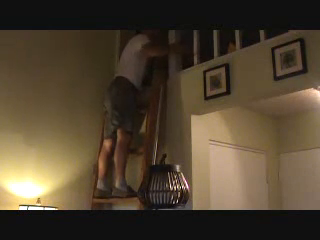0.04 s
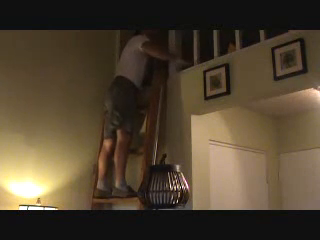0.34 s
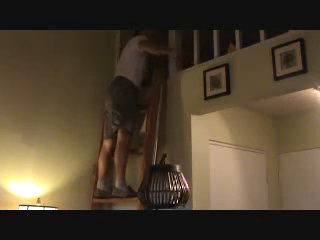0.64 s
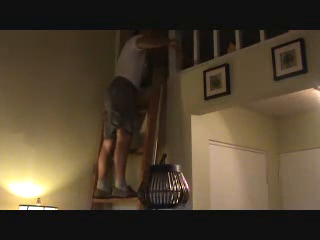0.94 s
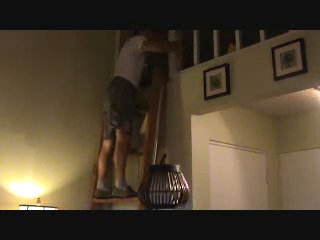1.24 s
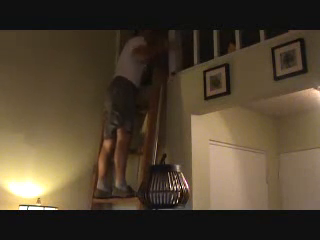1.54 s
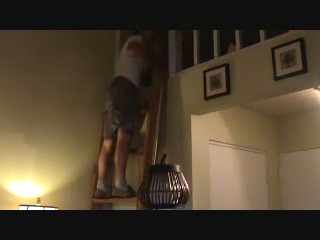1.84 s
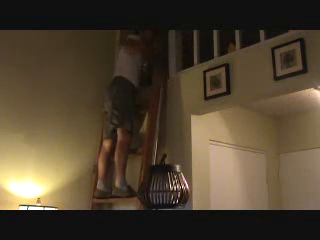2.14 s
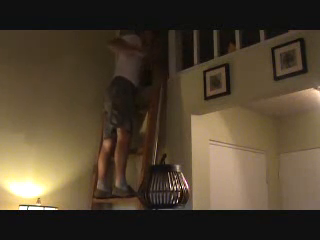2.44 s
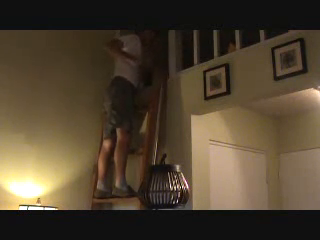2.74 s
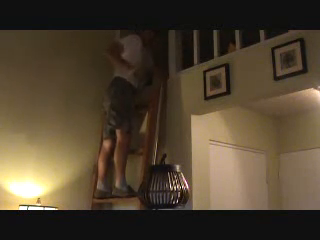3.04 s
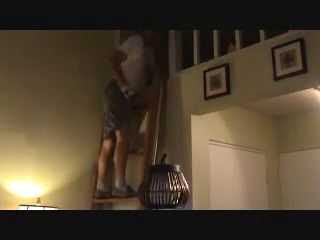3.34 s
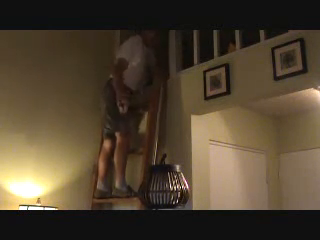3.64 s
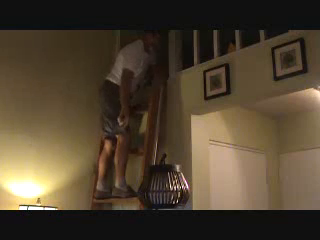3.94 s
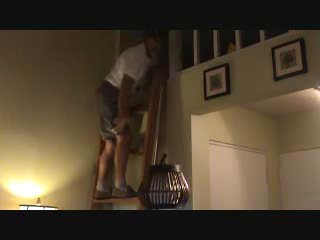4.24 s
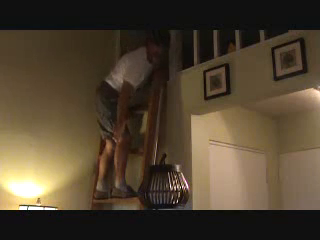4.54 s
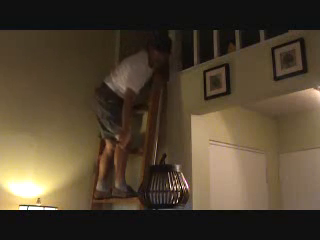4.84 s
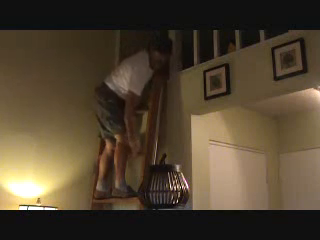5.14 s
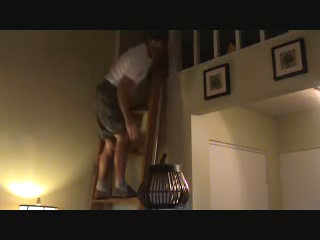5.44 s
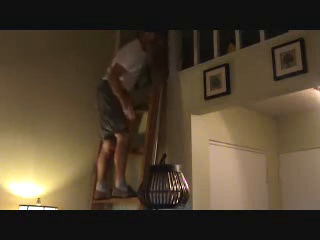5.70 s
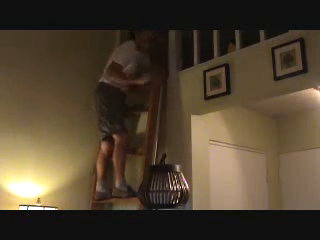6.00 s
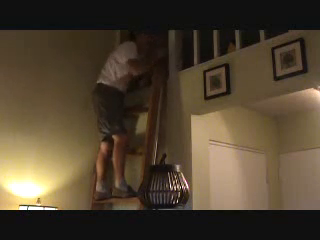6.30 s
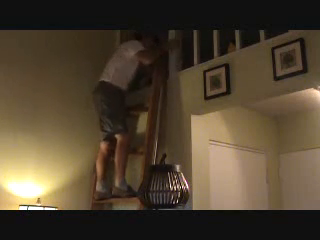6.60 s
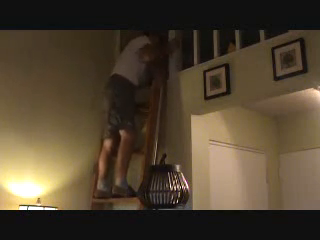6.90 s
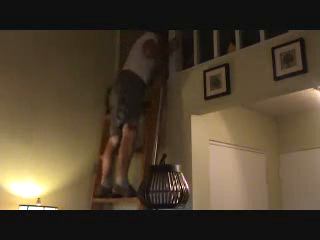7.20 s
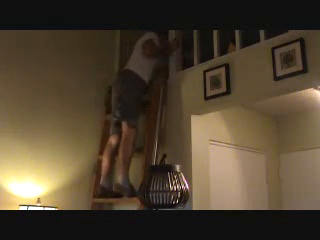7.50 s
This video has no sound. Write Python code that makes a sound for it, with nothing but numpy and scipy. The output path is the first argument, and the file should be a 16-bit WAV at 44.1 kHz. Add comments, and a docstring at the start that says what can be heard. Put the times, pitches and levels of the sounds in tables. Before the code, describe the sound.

Knocks and thuds on a wooden ladder, clothes rustling, then a steel tape measure rattling back into its case in an echoing room.

```python
"""A tall, bare living room, a phone's two microphone ports a few metres from a steep wooden ladder.
An appliance hums softly throughout. A man works on the ladder: clothes rustle, hands, feet and a tool
knock the wood into ringing, and the landing booms under his weight. From three seconds in, a hand
rumbles on the phone and small metal parts clink. Past five seconds a steel tape measure buckles,
chatters and rushes back into its case with three slaps; a faint rustle follows."""
import sys
import numpy as np
from scipy import signal
from scipy.fft import rfft, irfft
from scipy.io import wavfile
from scipy.ndimage import uniform_filter1d

SR = 44100
rng = np.random.default_rng(int(sys.argv[2]) if len(sys.argv) > 2 else 0)


def materialize(psi):
    """Save the field psi as 16-bit PCM at rate SR to the path in sys.argv[1].

    A 1-D psi becomes a single channel; in a 2-D psi each row is a channel.
    """
    bounded = np.clip(np.atleast_2d(psi).T, -1, 1)
    quanta = np.round(bounded * 32767).astype(np.int16)
    wavfile.write(sys.argv[1], SR, quanta)


N = 333396

# resonances of the landing floor: pitch_hz, width_hz, gain_db
FLOOR_MODES = [(113, 18, -3), (156, 40, 3.5), (250, 30, 1), (315, 180, -3), (405, 54, -10)]


def undb(db):
    return 10 ** (np.asarray(db) / 20)


def unit(x):
    """Scale to rms 1."""
    return x / np.sqrt(np.mean(x ** 2) + 1e-20)


def at_hz(rows, hz):
    """Read rows of frequency_hz, value on a log-frequency axis."""
    row_hz, value = np.transpose(rows)
    return np.interp(np.log(hz + 1), np.log(row_hz + 1), value)


def bins(x):
    return np.fft.rfftfreq(len(x), 1 / SR)


def band(x, lo_hz, hi_hz, order):
    return signal.sosfilt(signal.butter(order, [lo_hz, hi_hz], "band", fs=SR, output="sos"), x)


def resonate(x, modes):
    """Parallel resonances from rows of pitch_hz, width_hz, gain_db."""
    return sum(undb(db) * signal.lfilter(*signal.iirpeak(hz, hz / width, SR), x)
               for hz, width, db in modes)


def decay(t, t60_s):
    return np.exp(-np.log(1000) * t / t60_s)


def add(out, start_s, x):
    i = int(start_s * SR)
    out[i:i + len(x)] += x[:N - i]


def slips(size, per_s, spread_db):
    """Tiny random impacts of uneven strength."""
    impacts = (rng.random(size) < per_s / SR) * rng.choice([-1, 1], size)
    return impacts * undb(spread_db * rng.standard_normal(size))


def swells(rows):
    """Gain over time of smooth movements, from rows of middle_s, half_length_s, level_db."""
    t = np.arange(N) / SR
    return np.sqrt(sum((undb(db) * np.exp(-((t - s) / half) ** 2)) ** 2 for s, half, db in rows))


def steady(tones):
    """Pure tones from rows of pitch_hz, level_db."""
    t = np.arange(N) / SR
    return sum(undb(db) * unit(np.sin(2 * np.pi * (hz * t + rng.random()))) for hz, db in tones)


def room(direct_db, build_s=0.0005):
    """The room heard from the microphone: direct sound, then a dense tail that differs for each spot."""
    # reverberation of the bare room: frequency_hz, t60_s
    reverb_times = [(100, 0.94), (260, 0.64), (700, 0.37), (1800, 0.42), (4800, 0.35), (11000, 0.33)]
    t = np.arange(SR) / SR
    edges, hz = np.geomspace(40, 16000, 9), bins(t)
    noise = rfft(rng.standard_normal(SR))
    tail = sum(irfft(noise * (hz >= lo) * (hz < hi), SR) * decay(t, at_hz(reverb_times, np.sqrt(lo * hi)))
               for lo, hi in zip(edges, edges[1:]))
    tail *= 1 - np.exp(-t / build_s)
    tail /= np.linalg.norm(tail)
    tail[0] += undb(direct_db)
    return tail


def in_room(x, direct_db):
    return signal.fftconvolve(x, room(direct_db))[:len(x)]


def room_tone(air_db=-53):
    """Steady air noise under an appliance's motor tones, wavering hum and faint whine."""
    # spectrum of the air noise: frequency_hz, relative_db
    air_spectrum = [(18, -56), (30, -8), (48, -11), (86, -12.5), (116, -9.5), (207, -7.5), (246, -10),
                    (317, -9.5), (761, -13.5), (821, -24), (885, -21), (2180, -27), (3430, -27.5),
                    (12000, -34.5), (15600, -66), (22000, -120)]
    # wavering hum of the appliance casing: pitch_hz, width_hz, level_db
    casing_hum = [(130, 5.1, -58), (260.8, 5.8, -62), (476.7, 7.2, -63.5), (520, 31, -58.5)]
    # tones of its motor: pitch_hz, level_db
    motor_tones = [(59.2, -60.5), (86, -69), (118.4, -64), (239.8, -60)]
    # thin electronic whine: pitch_hz, level_db
    whine_tones = [(3268, -73.5), (3499, -76.5), (3558, -76.5), (4317, -77), (11343, -81)]
    noise = rng.standard_normal(N)
    hz = bins(noise)
    air = unit(irfft(rfft(noise) * undb(at_hz(air_spectrum, hz)), N)) * undb(air_db)
    drive = rfft(rng.standard_normal(N))
    hum = sum(undb(db) * unit(irfft(drive * np.exp(-((hz - pitch) / width) ** 2), N))
              for pitch, width, db in casing_hum)
    return air + hum + steady(motor_tones) + steady(whine_tones)


def rustle(rest_db=-67.5):
    """Cloth catches and slips in fine grains, never quite still."""
    # clothes and socks rub as he reaches or shifts: middle_s, half_length_s, relative_db
    reaches = [(.7, 0.57, -55), (1.11, 0.15, -43), (2.08, 0.17, -45), (2.65, 0.43, -59), (3.5, 0.34, -56),
               (4.25, 0.3, -55.5), (5.3, 0.75, -62), (7.2, 0.085, -59)]
    grains = slips(N, per_s=2500, spread_db=2.4)
    cloth = band(grains, 310, 2010, order=2) + undb(-11.5) * band(grains, 1200, 6800, order=2)
    movement = np.hypot(swells(reaches), undb(rest_db))
    return in_room(unit(cloth) * movement, direct_db=0.5) * undb(-3.5)


def knock_colour(level_db, body_hz, crack_db, even_hz=883, thud_db=-20, tick_db=-7.5):
    """Levels of thud, body, clack, snap and tick: small parts, pitched above even_hz, mostly clack."""
    clack_over_body_db = 11.5 * np.log2(body_hz / even_hz)
    body_db = -20 * np.log10(np.hypot(1, undb(clack_over_body_db)))
    return level_db + np.array([thud_db, body_db, body_db + clack_over_body_db,
                                crack_db, crack_db + tick_db])


def knock(contact_ms, body_hz, band_db, ring_db=-8.5, body_width_hz=220):
    """One contact rings on in the room; the part struck sets the colour."""
    # modes of the woodwork: pitch_hz, relative_db, t60_s
    wood_modes = [(360.5, 0.5, 0.14), (448, 6, 0.49), (569.5, 8.5, 0.35), (735.6, 10, 0.29), (852, 2, 0.14),
                  (992, -12, 0.1), (1173, -10, 0.51), (1262, -10, 0.69), (1480, -6.5, 0.47),
                  (1780, -6, 0.38), (2646, 5, 0.095)]
    # borders of the thud, body, clack, snap and tick bands: frequency_hz
    band_edges = [100, 300, 1000, 2650, 6000, 12500]
    t = np.arange(SR) / SR
    # a hard touch starts with a click, a soft one swells
    blow = room(direct_db=-6 - contact_ms, build_s=contact_ms / 1000)
    ring = sum(undb(db + rng.standard_normal()) * np.sin(2 * np.pi * (hz * t + rng.random()))
               * decay(t, t60) for hz, db, t60 in wood_modes)
    ring *= 1 - np.exp(-t / 0.002)  # the ring takes a moment to swing up
    thud = resonate(blow * np.exp(-t / 0.15), FLOOR_MODES)  # the floor soaks up the lows quickly
    body = resonate(blow, [(body_hz, body_width_hz, 0)]) + undb(-12) * blow  # the part's own pitch
    attack = slice(int(.07 * SR))
    out = 0
    for k, (source, db) in enumerate(zip([thud, body, blow, blow, blow], band_db)):
        lo, hi = band_edges[k:k + 2]
        part = unit(band(source, lo, hi, order=4))
        if k in (1, 2):  # the ring lies in the body and clack bands
            part = part + undb(ring_db) * unit(band(ring, lo, hi, order=4))
        if k >= 2:  # the force of a blow falls towards the treble
            part = band(part, lo / 2, min(0.56 * (lo + hi), 7500), order=2)
        out = out + undb(db) * part / np.std(part[attack])
    return out


def knocks_and_slaps():
    """Steps, grabs and taps on the ladder, then three slaps as the tape measure runs in."""
    # hands, feet and tool land; the last three rows are the tape's slaps:
    # start_s, level_db, contact_ms, pitch_hz, crack_over_level_db
    contacts = [(0.309, -38, .8, 1430, -13.5), (0.429, -38.5, 8, 425, -20.5),
                (0.482, -38, 0.55, 1900, -10.5), (0.610, -43.5, 0.67, 1460, -13.5),
                (0.778, -29.5, 1.7, 554, -10), (0.907, -43, 4.8, 890, -16), (1.034, -36, 12, 1260, -6),
                (1.11, -40, 4.5, 1260, -5), (1.335, -17.5, 4.8, 806, -14.5),
                (1.507, -31.5, 0.66, 810, -15.5), (1.729, -36.5, 3.5, 500, -18.5),
                (1.789, -43.5, 22, 905, -15.5), (1.995, -34.5, 10.5, 1020, -10),
                (2.056, -34.5, 4, 1210, -11), (2.180, -39.5, 4.5, 900, -32), (2.532, -44, 5, 755, -7),
                (2.809, -47, 6, 805, -14), (3.412, -42.5, 5.4, 670, -10), (3.553, -55.5, 1.2, 1150, -8),
                (4.102, -49.5, 3.6, 604, -16), (4.267, -37.5, 3, 730, -8.5), (4.472, -46, 3.5, 630, -12.5),
                (4.703, -40, 2.6, 630, -6.5), (5.357, -49, 3.6, 484, -20), (5.608, -33, 4.7, 1000, 1.5),
                (5.671, -23.5, .8, 730, -11.5), (5.928, -27, 1.4, 610, -15)]
    # a hard knock leaves the side rail singing: start_s, pitch_hz, t60_s, level_db
    rail_rings = [(0.779, 728, 2.2, -38.5)]
    out, t = np.zeros(N), np.arange(SR) / SR
    for start_s, level_db, contact_ms, body_hz, crack_db in contacts:
        add(out, start_s, knock(contact_ms, body_hz, knock_colour(level_db, body_hz, crack_db)))
    for start_s, hz, t60, db in rail_rings:
        add(out, start_s, undb(db) * np.sin(2 * np.pi * hz * t) * decay(t, t60))
    return out


def footfalls(push_s=0.056, linger_db=-12):
    """A short heavy push rings the landing floor; the boom lingers in the room."""
    # his weight comes down: start_s, level_db
    steps = [(0.437, -25), (0.788, -32.5), (2.224, -52)]
    out, t = np.zeros(N), np.arange(SR) / SR
    for start_s, db in steps:
        push = room(direct_db=-8, build_s=0.0041) * (np.exp(-t / push_s) + undb(linger_db))
        boom = band(resonate(push, FLOOR_MODES), 89, 487, order=3)
        add(out, start_s, undb(db) * boom / np.std(boom[:SR // 14]))
    return out


def handling():
    """Soft rumble reaches the microphone through the body of the phone."""
    # the hand shifts its grip: middle_s, half_length_s, level_db
    grips = [(3.08, .04, -55), (3.52, 0.098, -43), (3.95, 0.34, -63)]
    return unit(band(rng.standard_normal(N), 8.2, 60, order=2)) * swells(grips)


def clinks(tick_db=-15):
    """Small metal parts touch in the hand, each ringing in one band under a bright tick."""
    # metal contacts: start_s, pitch_hz, width_hz, level_db
    touches = [(3.141, 7900, 1500, -61.5), (3.236, 3580, 1170, -49.5), (3.930, 7100, 4000, -63.5),
               (5.190, 7000, 4000, -64)]
    out = np.zeros(N)
    for start_s, hz, width, db in touches:
        tap = room(direct_db=-11)
        ring = band(tap, hz - width / 2, hz + width / 2, order=2)
        ring += undb(tick_db) * band(tap, 6000, 12500, order=2)
        add(out, start_s, undb(db) * ring / np.std(ring[:SR // 14]))
    return out


def blade_flexes(hiss_db=-29):
    """The tape's thin steel buckles in a burst of ticks and rings on."""
    # the blade bends: start_s, length_s, level_db
    flexes = [(5.446, 0.035, -40), (5.516, 0.046, -29)]
    # modes of the blade: pitch_hz, width_hz, gain_db
    blade_modes = [(560, 880, -10.5), (1210, 42, 1), (1410, 78, 0), (1670, 120, 1.5), (2020, 49, -5),
                   (2283, 37, -0.5), (4030, 75, -13), (4140, 110, -14), (9300, 590, -16.5)]
    out, t = np.zeros(N), np.arange(SR) / SR
    for start_s, length_s, db in flexes:
        burst = np.exp(-(t / length_s) ** 2) * (1 - np.exp(-t / 0.005))
        chatter = slips(SR, per_s=4400, spread_db=7.4) * burst
        ring = in_room(resonate(chatter, blade_modes) + undb(hiss_db) * chatter, direct_db=-11.5)
        add(out, start_s, undb(db) * ring / np.std(ring[:SR // 12]))
    return out


def blade_motion(attack_s=0.0039, release_s=0.027):
    """Gain over time of the moving blade: each run starts fast, holds and dies away."""
    # the blade runs in, is caught, and runs home: start_s, length_s, relative_db
    runs = [(5.607, 0.015, -15.5), (5.69, 0.17, -15)]
    t = np.arange(N) / SR
    return sum(undb(db) * np.clip((t - start_s) / attack_s, 0, 1)
               * np.exp(-np.maximum(t - start_s - length_s, 0) / release_s)
               for start_s, length_s, db in runs)


def rewind(reel_hz=62, flutter=0.69, slap_db=-9):
    """The blade scrapes through the slot and rattles the case, harder once on each turn of the reel."""
    # resonances of the case: pitch_hz, width_hz, gain_db
    case_modes = [(510, 290, 1.5), (1534, 290, 6.5), (1610, 170, 7.5), (1630, 770, 2), (2200, 150, -4),
                  (2800, 910, -7), (4070, 600, -56), (7150, 1800, -38)]
    speed_wander = unit(uniform_filter1d(rng.standard_normal(N), SR // 20))
    turns = np.cumsum(reel_hz * (1 + .2 * speed_wander)) / SR
    scrape = slips(N, per_s=4500, spread_db=3.2) * (1 + flutter * np.sin(2 * np.pi * turns))
    rattle = unit(resonate(scrape, case_modes) + undb(-46) * scrape)
    # the whipping blade slaps the rim of the slot once a turn, never twice alike
    strength = undb(3 * rng.standard_normal(int(turns[-1]) + 1))[turns.astype(int)]
    slaps = rng.standard_normal(N) * strength * np.exp(-(turns % 1) / .12)
    rattle += undb(slap_db) * unit(band(slaps, 1600, 3600, order=1))
    rattle = band(rattle, 300, 9800, order=3)
    softened = band(rattle, 30, 4360, order=1)
    return in_room(softened * blade_motion(), direct_db=0) * undb(-5)


def two_ports(x, diffuse, scatter_db=-9, stereo_top_hz=4100):
    """The two microphone ports differ in level, phase and the reflections caught; the treble is mono."""
    # left port against right: frequency_hz, left_minus_right_db, left_lead_rad
    port_balance = [(50, 2, -0.8), (170, -8.5, -1), (377, -4, -0.87), (830, 1.5, -0), (2000, -0.4, -0.28)]
    # sound from all sides, alike at the close ports in the bass: frequency_hz, side_minus_mid_db
    diffuse_width = [(50, -25), (120, -22), (240, -15), (450, -15.5), (900, -0.5), (1600, 1), (3400, 1)]
    hz, spectrum, ports = bins(x), rfft(x), np.array(port_balance)
    left_gain = undb(at_hz(ports[:, :2], hz) / 2) * np.exp(.5j * at_hz(ports[:, ::2], hz))
    right_gain = 1 / left_gain
    t = np.arange(SR // 4) / SR
    echoes = rng.standard_normal(len(t)) * np.exp(-t / .04)
    scatter = undb(scatter_db) * rfft(echoes / np.linalg.norm(echoes), N) * np.minimum(hz / 200, 1)
    mid = irfft(spectrum * (left_gain + right_gain) / 2, N)
    side_spectrum = spectrum * ((left_gain - right_gain) / 2 + scatter)
    side_spectrum += rfft(diffuse) * undb(at_hz(diffuse_width, hz))
    side = irfft(side_spectrum * np.clip(1 - (hz / stereo_top_hz) ** 6, 0, 1), N)
    return np.array([mid + side, mid - side])


def scene():
    """The man a few metres off, room tone from all sides, and handling that shakes both ports alike."""
    man = knocks_and_slaps() + footfalls() + clinks() + blade_flexes() + rewind() + rustle()
    return two_ports(man, diffuse=room_tone()) + room_tone() + handling()


def record(dry, drive=0.45, makeup_db=0.58, top_hz=12100):
    """The phone rounds the loudest peaks with one gain for both ports and cuts the top."""
    peak = drive * np.abs(dry).max(axis=0) + 1e-9
    rounded = dry * np.tanh(peak) / peak * undb(makeup_db)
    return signal.sosfilt(signal.ellip(10, .2, 80, top_hz, fs=SR, output="sos"), rounded)


dry = scene()
out = record(dry)
materialize(out)
```